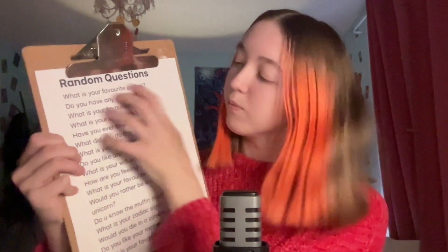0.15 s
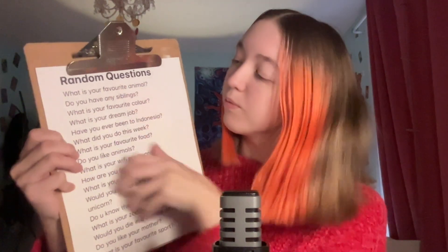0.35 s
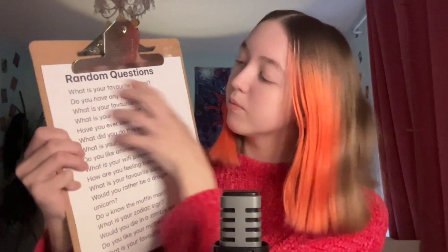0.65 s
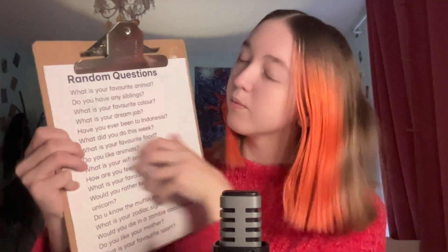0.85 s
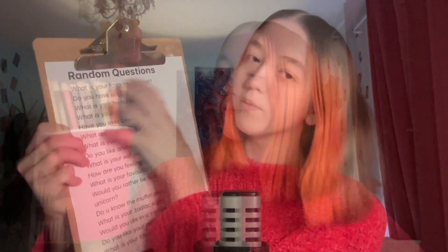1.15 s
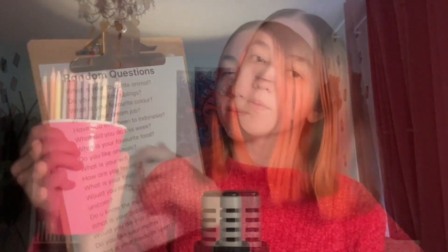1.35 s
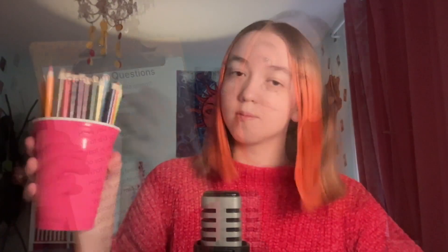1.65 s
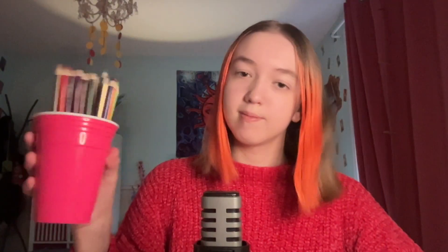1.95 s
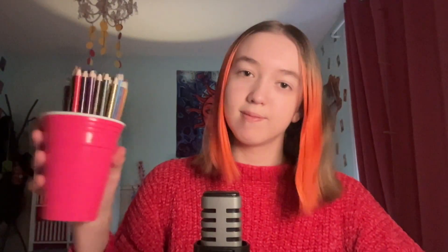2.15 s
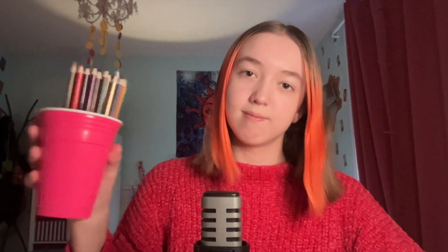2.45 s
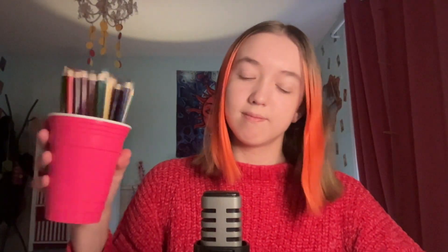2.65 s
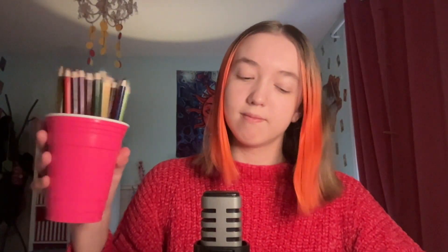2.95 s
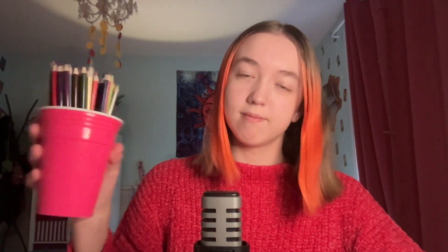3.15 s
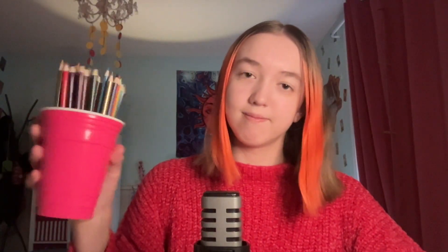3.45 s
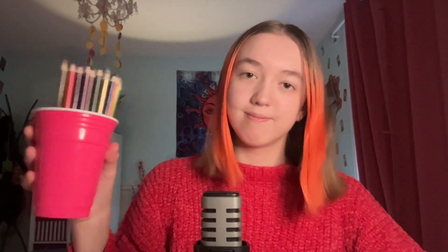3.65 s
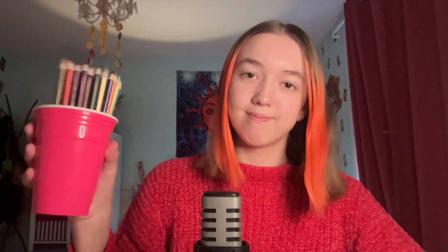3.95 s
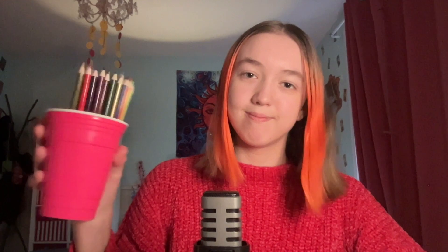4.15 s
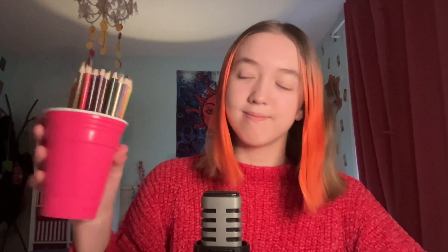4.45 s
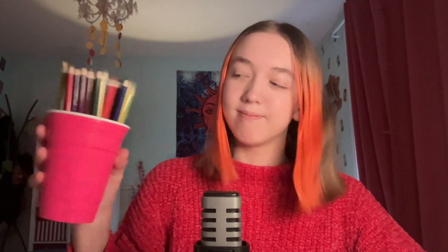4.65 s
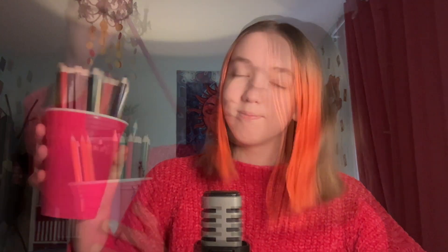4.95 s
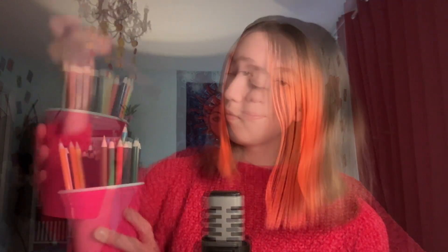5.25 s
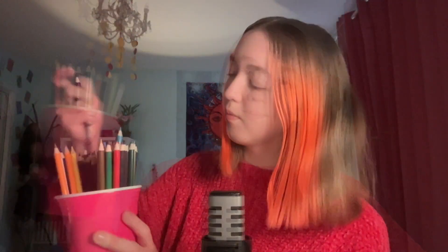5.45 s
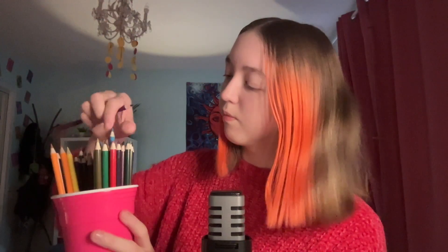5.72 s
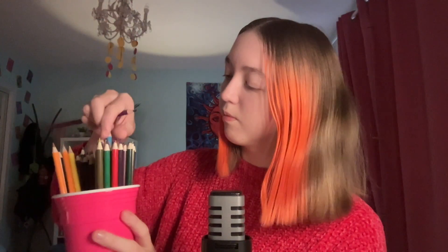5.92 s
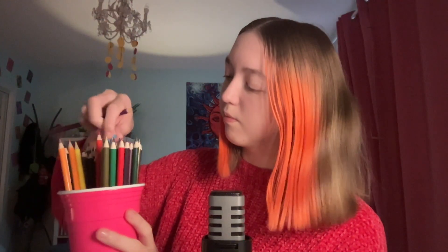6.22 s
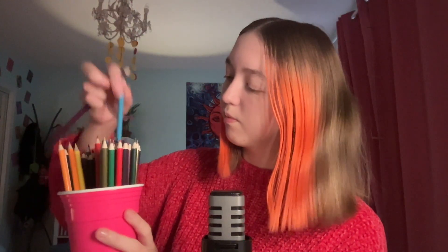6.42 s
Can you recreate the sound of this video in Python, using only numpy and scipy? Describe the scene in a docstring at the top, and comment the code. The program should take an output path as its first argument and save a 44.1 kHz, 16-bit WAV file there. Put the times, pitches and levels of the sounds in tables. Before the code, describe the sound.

Dry, grainy rubbing on paper with dull bumps of the board comes first, very quiet. Loud, crisp pencil rattles in a thin plastic cup take over, steady to-and-fro shakes with hard wooden cracks and short settling tails, brighter as they go. They stop, leaving room hum, a few gentle pencil ticks and a faint drawn-out scrape. Close microphone, small furnished room, short weak reverberation.

```python
"""Close to a microphone in a quiet room, fingers rub a sheet of paper on a clipboard: grainy filtered noise.
Then a plastic cup of coloured pencils is shaken to and fro. In each shake they lift off, jostle, slam into
the wall and settle: a hail of short contacts, each a crack, a wall rattle and ringing wood.
At the end the room's low drone rises, fingertips nudge the pencils, which tick softly, and one is drawn out
along its neighbours: a scrape of noise through wavering resonances."""
import sys
import numpy as np
from scipy import signal
from scipy.fft import rfft, irfft
from scipy.io import wavfile
from scipy.ndimage import uniform_filter1d, minimum_filter1d

SR = 44100
rng = np.random.default_rng(int(sys.argv[2]) if len(sys.argv) > 2 else 0)


def dump(signal):
    """Clip the signal to [-1, 1] and save it as 16-bit WAV at the path in sys.argv[1]."""
    limited = np.clip(np.atleast_2d(signal).T, -1, 1)
    pcm = np.round(limited * 32767).astype(np.int16)
    wavfile.write(sys.argv[1], SR, pcm)


N = 290266
TIME = np.arange(N) / SR  # s

# shakes of the cup: lift_s, lift_knock_db, jostle_db, slam_s, slam_db, slam_length_s,
# hardness_db (treble), thump_db (cup against the slam)
SHAKES = [(1.3755, -17.5, -30, 1.483, -26.5, 0.082, -1, -5.5),
          (1.7215, -16, -26, 1.8036, -19, 0.071, 7.5, -5.5),
          (1.9955, -6.5, -23, 2.1206, -17, 0.046, 7, -9.5), (2.298, -10.5, -27, 2.3784, -19, 0.074, 6, -6),
          (2.602, -7, -28, 2.68, -20, 0.062, 6, -7), (2.8889, -10.5, -27.5, 2.978, -21.5, 0.073, 1.5, -5.5),
          (3.1528, -11.5, -24, 3.2606, -20, 0.086, 7.5, -9),
          (3.5132, -14, -24, 3.5707, -17.5, 0.033, 3, -15),
          (3.7666, -12, -26.5, 3.8489, -17.5, 0.032, 10.5, -15.5),
          (4.0279, -8, -27, 4.119, -16, 0.043, 5, -14.5), (4.3062, -13, -23.5, 4.4218, -13.5, .025, 9, -21),
          (4.6309, -9, -26.5, 4.702, -18, 0.035, 9.5, -17.5),
          (4.9052, -12.5, -31.5, 5.006, -18.5, 0.032, 12, -19),
          (5.1748, -8, -32.5, 5.279, -26, 0.026, 10.5, -17),
          (5.466, -29.5, -47, 5.548, -47, 0.038, 3.5, -22)]
# stray pencils that knock clear of the rattle: start_s, level_db, body_db (cup against the wood),
# snap_db (treble against the wood)
STRAY_KNOCKS = [(1.1644, -27, -17, -13), (1.2231, -27.5, -3, -11), (1.263, -30, 6, -12),
                (1.2901, -22, -22, -12), (1.3058, -23.5, -16, -16), (1.405, -12.5, -11, -25),
                (1.475, -9.5, -10, -13), (1.499, -8, -5, -6), (1.5823, -9, -15, -7.5),
                (1.6506, -13.5, -5, -23), (1.6843, -18, 5, -20), (1.7384, -11, 0, -28),
                (1.926, -15, -30, -7), (2.0362, -2.5, -16, -14), (2.337, -13, -18, -1),
                (2.4441, 1.5, -35, -3.5), (2.4679, -6.5, -29, -18), (2.5762, -18.5, -12, -20),
                (2.833, -11.5, -35, -4), (2.855, -13, -28, -11), (2.962, -13, -3, -21),
                (3.184, -8, -9, -12), (3.1976, -2, -16, -6.5), (3.244, -16, -7, -16),
                (3.2733, -3.5, -8.5, -9), (3.3065, -1, -34, -0.5), (3.455, -11.5, -14, -19),
                (3.7389, -14, -18, -35), (3.817, -6, -12, -22), (3.8654, 0, -28, -4),
                (3.952, -12, -18, -23), (3.9885, -12.5, -8, -18), (4.083, -12.5, -9, -24),
                (4.2671, -15.5, -8.5, -17), (4.376, -8.5, -11, -29), (4.5825, -12, -9.5, -14),
                (4.6805, -7.5, -12, -18), (4.7245, -2, -27, -25), (4.7613, -4, -30, -2),
                (4.8588, -19, -27, -26.5), (4.929, -11, -15, -9.5), (4.9521, -11, -6, -21),
                (5.1188, -14.5, -28, -9), (5.2267, -15, -3, -23), (5.3975, -30, -20, -14),
                (5.44, -24, -24.5, -16), (5.4806, -32, -20, -8), (5.5019, -33, -3, -21),
                (5.8092, -28, -29, -26.5), (5.8897, -30.5, -27.5, -35), (5.971, -37, 0, -27),
                (6.0308, -27.5, -13, -26), (6.0858, -31, -8.5, -35.5), (6.265, -31, -13, -35.5)]
# bending modes of a pencil, before its tuning: pitch_hz, level_db
PENCIL_MODES = [(1000, -11.5), (2150, -3.5), (4400, -4.5), (6900, -8), (11400, -10.5)]
# colour of the cup full of pencils: pitch_hz, level_db
CUP_COLOUR = [(60, -37), (130, -16.5), (320, -6.5), (1070, -3), (1340, -3.5), (2000, -.5), (2900, -1),
              (3800, -4.5), (4550, -1.5), (6000, -9.5), (7000, -4.5), (9000, -18.5), (11600, -17),
              (16000, -32)]
# steady rub of the fingers under the strokes: time_s, level_db
RUB = [(0, -50), (.08, -46), (.25, -43), (.45, -45.5), (.85, -43.5), (.97, -49), (1.1, -43.5), (1.3, -43.5),
       (1.45, -49)]
# the hand sweeps to and fro over the paper: middle_s, length_s, hiss_db, drumming_db (board)
STROKES = [(0.134, 0.17, -45.5, -55), (0.406, 0.12, -49, -47.5), (.545, 0.062, -44, -57),
           (.69, 0.074, -44, -61), (0.868, 0.078, -40, -43), (1.042, 0.056, -38, -38.5)]
# colour of the rubbed paper: pitch_hz, level_db
PAPER_COLOUR = [(900, -20), (1300, -19.5), (2000, -15), (2700, -11), (3600, -12.5), (5000, -7.5),
                (6200, -6.5), (7400, -3.5), (9200, -8), (11200, -3), (12700, -12), (16000, -23.5)]
# colour of the drumming clipboard: pitch_hz, level_db
BOARD_COLOUR = [(60, -12), (130, -0.5), (200, 1), (270, -2.5), (380, 1.5), (560, -6), (800, -12),
                (1050, -8.5), (1800, -16), (4000, -43)]
# the hand bumps the board: start_s, level_db, pitch_hz
BUMPS = [(.14, -46, 126), (0.424, -35, 72), (.55, -41, 62), (.67, -43, 45), (.71, -43, 114),
         (.80, -42, 100)]
# a nail catches the paper: start_s, level_db
NAIL_CATCHES = [(.912, -30), (.938, -22)]
# a pencil slides out: time_s, level_db
SLIDE_LEVEL = [(6.30, -77), (6.36, -57), (6.42, -53.5), (6.47, -53), (6.53, -54.5), (6.58, -57)]
# what the sliding pencil rings with: pitch_hz, width_hz, level_db
SLIDE_MODES = [(1500, 550, -7), (2680, 400, -0.5), (4350, 670, -1), (6350, 310, 0), (7240, 800, -5.5),
               (8960, 600, -8), (10600, 400, -6.5), (11970, 700, -4)]
# colour of the still room: pitch_hz, level_db
AIR_COLOUR = [(15, -45), (25, -1.5), (108, -8.5), (180, -10.5), (229, -9), (285, -24.5), (394, -15.5),
              (734, -25.5), (1740, -24), (2220, -33), (4610, -39), (14800, -46.5), (16000, -61)]
# resonances of the room's low drone: pitch_hz, width_hz, level_db
HUM_MODES = [(97, 1.8, -5.5), (122.7, 10, -11), (234, 10, -22)]
# the drone over time: time_s, level_db
HUM_LEVEL = [(0, -61.5), (5.0, -62.5), (5.6, -52), (6.2, -51.5), (6.35, -55), (6.58, -55)]
# decay of the room tail: pitch_hz, t60_s
ROOM_DECAY = [(200, 0.34), (1000, 0.27), (4500, 0.22), (9000, 0.18), (16000, 0.067)]

PENCIL_T60 = 0.026  # s; the neighbours damp it
RUN_IN_S, RUN_IN_DB = 0.042, -9.5  # the pencils start to shift just before they lift off
LIFT_BODY_DB, LIFT_SNAP_DB = -10.5, -19  # the first pencil loose bumps the far wall: hollow and soft
# the crack that opens a slam: level over the slam, body, snap over the hardness
CRACK_DB, CRACK_BODY_DB, CRACK_SNAP_DB = 11, -17, -17
USUAL_SLAM_S = 0.049  # a shorter slam lands more as one, and cracks harder
AIR_DB = -52.5
CEILING = 0.68  # limiter, full scale = 1
EDGE_HZ = 16000  # upper band limit


def amp(db):
    """Decibels to gain."""
    return 10 ** (np.asarray(db) / 20)


def unit(x):
    """Scales to rms 1."""
    return x / np.sqrt(np.mean(x ** 2) + 1e-20)


def read(points, hz):
    """Reads a spectrum on a log-frequency axis."""
    f, value = np.transpose(points)
    return np.interp(np.log(hz + 1), np.log(f + 1), value)


def level(rows):
    """Gain over time from a (time_s, level_db) curve; practically silent outside it."""
    time_s, level_db = np.transpose(rows)
    return amp(np.interp(TIME, time_s, level_db, left=-120, right=-120))


def add(mix, s, sound):
    """Mixes a sound in at time s, cut off where the mix ends."""
    part = mix[max(round(s * SR), 0):][:len(sound)]
    part += sound[:len(part)]


def band(x, hz, kind):
    """Third-order low-pass or high-pass."""
    return signal.sosfilt(signal.butter(3, hz, kind, fs=SR, output="sos"), x)


def colour(x, points, size=2048):
    """Causal minimum-phase filter with the given spectrum, so that attacks stay sharp."""
    log_gain = np.log(amp(read(points, abs(np.fft.fftfreq(size, 1 / SR)))))
    response = np.fft.ifft(np.exp(np.conj(signal.hilbert(log_gain)))).real
    return signal.oaconvolve(x, response)[:len(x)]


def resonate(x, modes):
    """Passes x through parallel fixed resonances (pitch_hz, width_hz, level_db)."""
    hz = np.fft.rfftfreq(N, 1 / SR)
    response = sum(amp(db) / (1 + 1j * (hz ** 2 - f ** 2) / (width * hz + 1e-6)) for f, width, db in modes)
    return irfft(rfft(x) * response, N)


def friction(grain_db):
    """Countless tiny slips of uneven strength: noise with a randomly wavering level."""
    grain = unit(uniform_filter1d(rng.standard_normal(N), size=30))
    return rng.standard_normal(N) * amp(grain_db * grain)


def rattle(settle_db_per_s=242.0, dulling_db_per_s=45., resting_db_per_s=110., jostle_treble_db=-3.5,
           slam_treble_db=-2.0, thump_t60=0.22, treble_hz=7500, lead_s=0.01, lead=0.14, first=0.77):
    """Loose pencils jostle in flight, then the bundle slams into the wall and settles ever more softly."""
    loose, packed, hard, bright, thump = np.zeros((5, N))
    for lift, _, jostle_db, slam, slam_db, length, hard_db, thump_db in SHAKES:
        # more and more pencils come loose during the swing
        flight_s = [lift - RUN_IN_S, lift, lift + 0.0019, lift + 0.018, slam, slam + 0.023]
        loose += amp(jostle_db) * np.interp(TIME, flight_s, [0, amp(RUN_IN_DB), first, 1, 1, 0])
        since = np.maximum(TIME - slam, 0)
        settling = np.maximum(since - length, 0)
        arrival = np.interp(TIME - slam, [-lead_s, 0, .003], [0, lead, 1])  # the foremost land early
        force = arrival * amp(slam_db - settle_db_per_s * settling)
        # slower contacts lose their treble, the more as they settle
        dulling = amp(-dulling_db_per_s * since - resting_db_per_s * settling)
        packed += force
        hard += force * dulling * amp(slam_treble_db)
        bright += force * dulling * amp(hard_db)
        thump += np.minimum(since / 0.0066, 1) * amp(slam_db + thump_db - 60 * since / thump_t60)

    sparse, dense = collisions(per_s=200, scatter_db=8.0), collisions(per_s=380, scatter_db=9)
    # only some contacts are hard enough to snap
    snaps = band(collisions(per_s=150, scatter_db=8), treble_hz, "high")
    jostle_treble = amp(jostle_treble_db) * band(sparse, treble_hz, "high")
    jostle = loose * (band(sparse, treble_hz, "low") + jostle_treble)
    slams = packed * band(dense, treble_hz, "low") + hard * band(dense, treble_hz, "high") + bright * snaps
    # the weight of the bundle flexes the bottom of the cup
    bottom_modes = [(170, 80, -9), (246, 90, -5), (311, 60, -0.5), (500, 160, -1)]  # pitch_hz, width_hz, level_db
    bottom = unit(band(resonate(rng.standard_normal(N), bottom_modes), 120, "high"))
    return jostle + slams + thump * bottom


def collisions(per_s, scatter_db, count=200):
    """A hail of contacts among the pencils, uneven in spacing and force, at rms 1."""
    most = N // 10
    force = amp(scatter_db * rng.uniform(-0.77, 1, most))
    pencil = rng.integers(0, count, most)
    # few very short gaps: a pencil must rebound before it strikes again
    times = np.cumsum(rng.gamma(2, .5, most)) / per_s
    sounds = [contact() for _ in range(count)]
    out = np.zeros(N)
    for s, size, k in zip(times[times < N / SR], force, pencil):
        add(out, s, size * sounds[k])
    return unit(colour(out, CUP_COLOUR))


def contact(shell_db=9.5, shell_t60=0.018, crack_db=9.0, crack_t60=0.0036, hardness_db=4., rebound=0.49,
            rebound_s=.003, size=3000):
    """One pencil strikes: hard crack, short rattle of the thin cup wall, bending modes, quick rebound."""
    t = np.arange(size) / SR
    tuning = np.exp(rng.uniform(-.24, .2))  # pencils differ in length
    ring = amp(shell_db - 60 * t / shell_t60) * rng.standard_normal(size)
    crack = np.diff(rng.standard_normal(size + 1))  # differencing tilts the noise to treble
    ring += amp(crack_db + hardness_db * rng.standard_normal() - 60 * t / crack_t60) * crack
    for hz, db in PENCIL_MODES:
        where = np.sqrt(2) * np.cos(2 * np.pi * rng.random())  # the point of contact weights each mode
        mode_hz = hz * tuning * rng.uniform(.96, 1.04)
        ring += where * amp(db - 60 * t / PENCIL_T60) * np.sin(2 * np.pi * mode_hz * t)
    out = ring.copy()
    add(out, rebound_s * rng.uniform(.25, 1), rebound * ring)
    return out / np.linalg.norm(out)


def knocks(crest_db=23.0, body_db=2.5, snap_db=3.0, body_most_db=-18.0, body_hz=1200, snap_hz=7500,
           hard_hz=16000, softening=.5, chain=0.36, chain_s=.003):
    """The distinct knocks: wood, with each its own share of hollow cup and hard snap."""
    out = np.zeros(N)
    for s, db, body, snap in blows():
        hit = contact(shell_db=13., shell_t60=0.015, crack_db=11.0, crack_t60=0.0035, rebound=0.42)
        # a heavy blow runs on through the neighbouring pencils
        passed_on = chain * np.interp(db, [-10, 0], [0, 1])
        for delay in np.cumsum(chain_s * rng.uniform(.5, 1.3, size=2)):
            add(hit, delay, passed_on * contact())
        hit = colour(hit, CUP_COLOUR)
        low, high = band(hit, body_hz, "low"), band(hit, snap_hz, "high")
        # a soft contact lasts longer, which dulls the wood as well
        dull_hz = np.clip(hard_hz * amp(softening * snap), 5000, snap_hz)
        wood = band(band(hit, body_hz, "high"), dull_hz, "low")
        body = min(body + body_db, body_most_db - db)  # the gripping hand limits how far the wall swings
        knock = unit(wood) + amp(body) * unit(low) + amp(snap + snap_db) * unit(high)
        add(out, s, amp(db - crest_db) * knock)
    return out


def blows():
    """Every knock (start_s, level_db, body_db, snap_db): one per lift-off, one per slam, and the strays."""
    lifts = [(lift, db, LIFT_BODY_DB, LIFT_SNAP_DB) for lift, db, *_ in SHAKES]
    cracks = []
    for _, _, _, slam, slam_db, length, hard_db, _ in SHAKES:
        crack_db = slam_db + CRACK_DB + 20 * np.log10(USUAL_SLAM_S / length)
        cracks.append((slam, crack_db, CRACK_BODY_DB, CRACK_SNAP_DB + hard_db))
    return lifts + cracks + list(STRAY_KNOCKS)


def paper(hiss_db=-3., edge_db=-3.0, stroke_edge_db=-7.5, board_db=-13.0, drag_db=-5.5, split_hz=9300,
          drag_hz=800):
    """Skin rubs over paper fibres, louder in each stroke; the palm drags and the board drums along."""
    rub = level(RUB)
    sweep = sum(amp(db) * swell(s, length) for s, length, db, _ in STROKES)
    press = sum(amp(db) * swell(s, length) for s, length, _, db in STROKES)
    hiss = colour(friction(grain_db=1.5), PAPER_COLOUR)
    out = np.hypot(amp(hiss_db) * rub, sweep) * unit(band(hiss, split_hz, "low"))
    edge_gain = np.hypot(amp(edge_db) * rub, amp(stroke_edge_db) * sweep)
    out += edge_gain * unit(band(hiss, split_hz, "high"))
    drumming = unit(colour(friction(grain_db=7.5), BOARD_COLOUR))
    out += np.hypot(amp(board_db) * rub, press) * drumming
    drag_modes = [(200, 71, -3), (370, 130, 2), (590, 160, -7), (1040, 350, -10)]  # pitch_hz, width_hz, level_db
    drag = resonate(friction(grain_db=4.5), drag_modes)
    out += amp(drag_db) * press * unit(band(drag, drag_hz, "low"))

    t = np.arange(SR // 5) / SR
    for s, db, hz in BUMPS:
        rise = t / 0.0077  # the bump is fullest after 7.7 ms
        add(out, s, amp(db) * rise * np.exp(1 - rise) * np.sin(2 * np.pi * hz * t))
    for s, db in NAIL_CATCHES:
        tick = band(rng.standard_normal(len(t)) * amp(-60 * t / 0.019), 8800, "low")
        add(out, s, amp(db) * tick / abs(tick).max())
    return out


def swell(middle, length):
    """The speed of one stroke: it gathers and slackens along a bell curve."""
    return np.exp(-2 * ((TIME - middle) / length) ** 2)


def slide(flutter_db=4.5, flutter_s=.04, top_hz=12800, catch_db=-7., catches_per_s=70):
    """Lacquered wood scrapes along its neighbours and catches; the moving contact makes each mode waver."""
    scrape, out = friction(grain_db=4.5), np.zeros(N)
    knots = np.arange(N // 100) * flutter_s
    for mode in SLIDE_MODES:
        flutter = np.interp(TIME, knots, rng.standard_normal(len(knots)))
        out += amp(flutter_db * flutter) * resonate(scrape, [mode])
    scraping = unit(band(band(out, top_hz, "low"), top_hz, "low"))
    catches = amp(catch_db) * collisions(per_s=catches_per_s, scatter_db=7, count=20)
    return level(SLIDE_LEVEL) * (scraping + catches)


def room(x, wet_db=-13.5, gap_s=.005):
    """A small furnished room: a weak diffuse noise tail whose treble dies first."""
    hz, t, z = signal.stft(rng.standard_normal(SR // 2), SR, nperseg=256)
    decay = amp(-60 * t / read(ROOM_DECAY, hz)[:, None])
    tail = signal.istft(z * decay, SR, nperseg=256)[1]
    tail = tail * (np.arange(len(tail)) / SR > gap_s)
    return x + amp(wet_db) * signal.fftconvolve(x, tail / np.linalg.norm(tail))[:N]


def background():
    """Still air as coloured noise, and a low drone as noise through narrow resonances."""
    air = amp(AIR_DB) * unit(colour(rng.standard_normal(N), AIR_COLOUR))
    drone = unit(band(resonate(rng.standard_normal(N), HUM_MODES), 400, "low"))
    return air + level(HUM_LEVEL) * drone


def scene():
    """Everything at one close microphone."""
    close = rattle() + knocks() + paper() + slide()
    return (room(close) + background())[None]


def record(dry):
    """A fast limiter holds down the loudest peaks; then the band limit."""
    gain = np.minimum(1, CEILING / (abs(dry) + 1e-9))
    gain = uniform_filter1d(minimum_filter1d(gain, size=130), size=130)
    low_pass = signal.firwin(301, EDGE_HZ, window=("kaiser", 8), fs=SR)
    return signal.oaconvolve(dry * gain, low_pass[None], "same")


dry = scene()
out = record(dry)
dump(out)
```